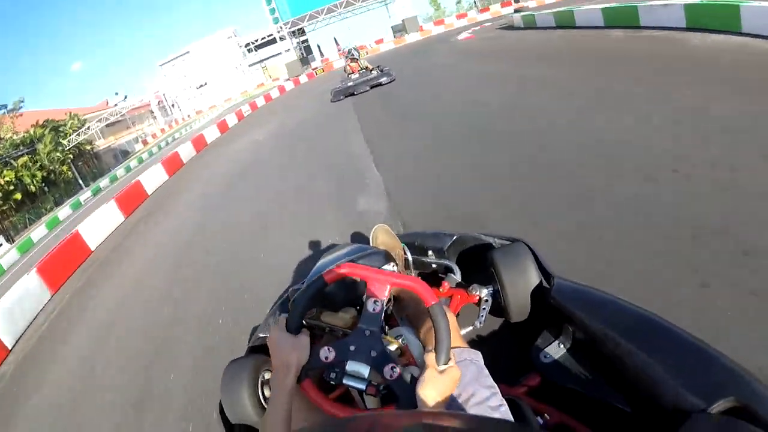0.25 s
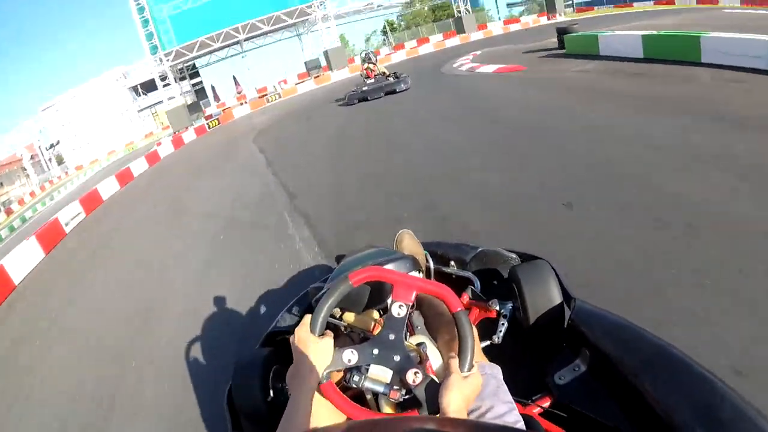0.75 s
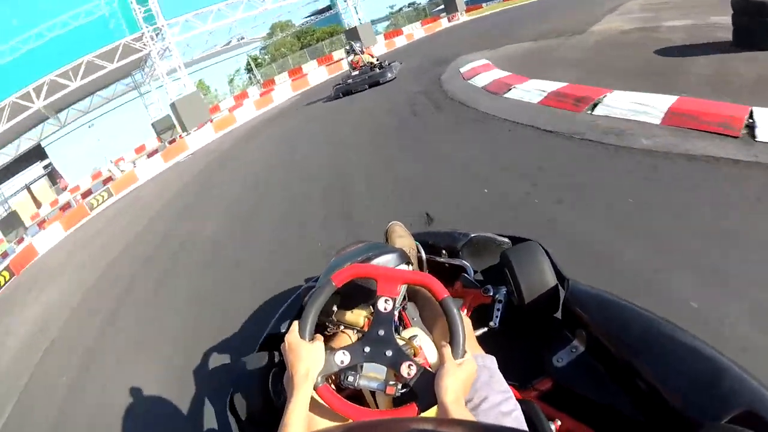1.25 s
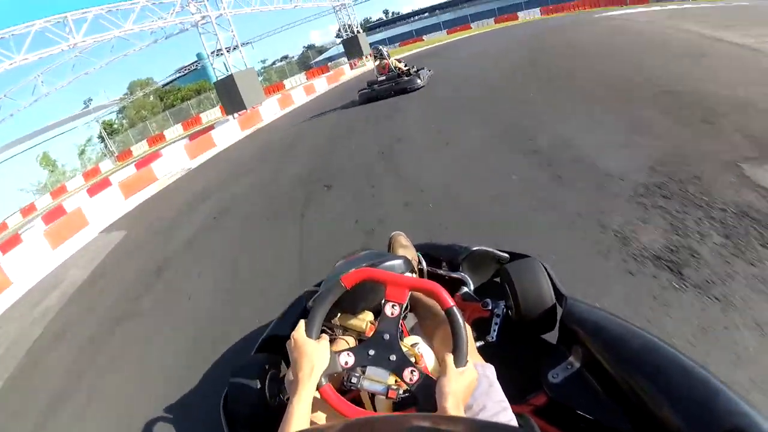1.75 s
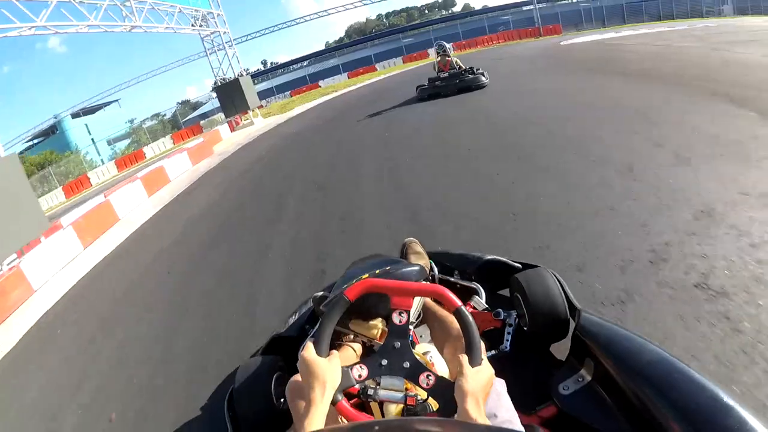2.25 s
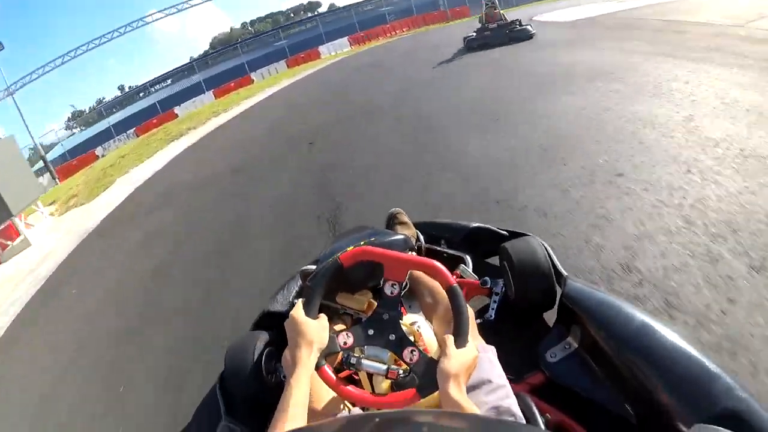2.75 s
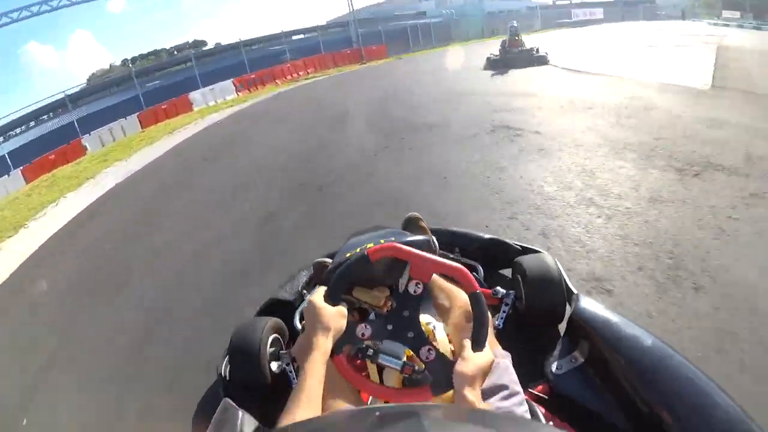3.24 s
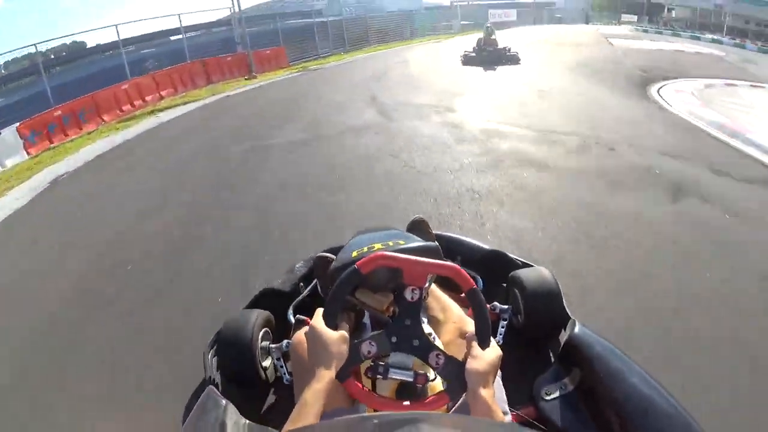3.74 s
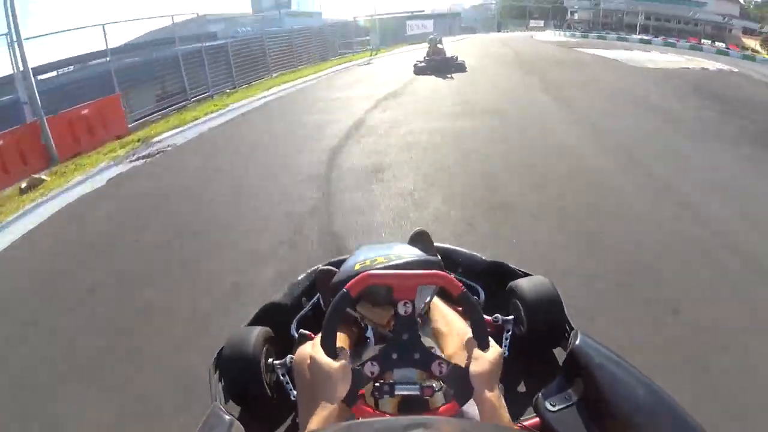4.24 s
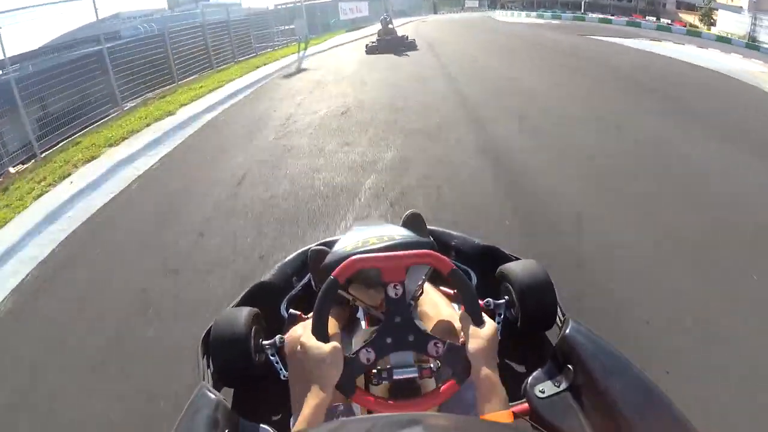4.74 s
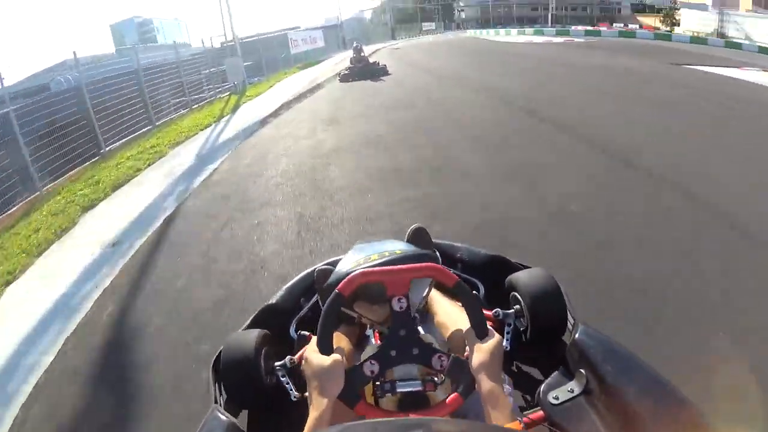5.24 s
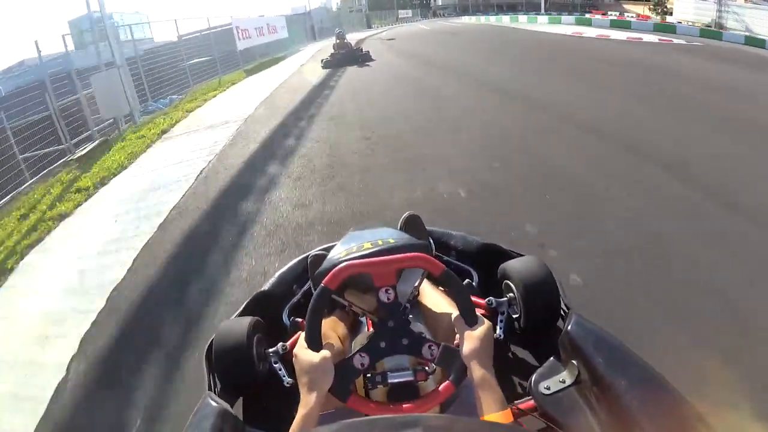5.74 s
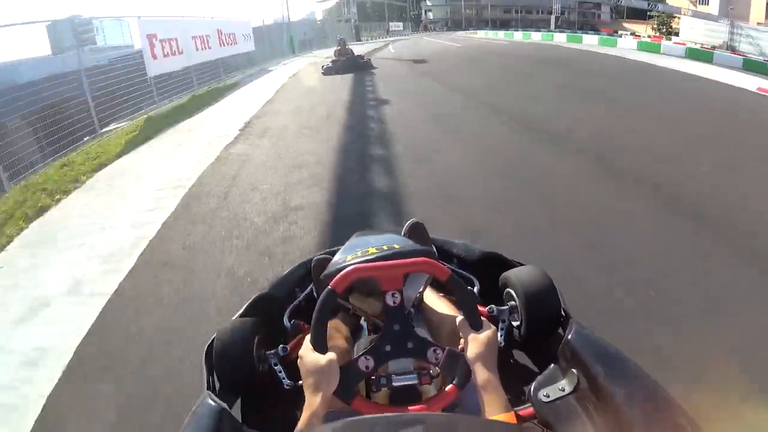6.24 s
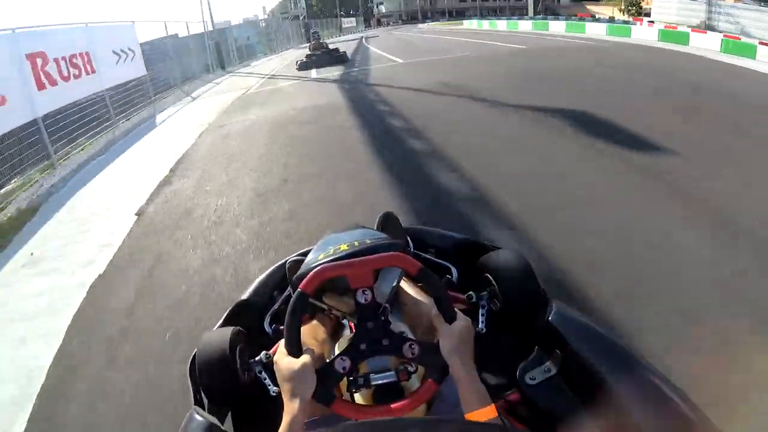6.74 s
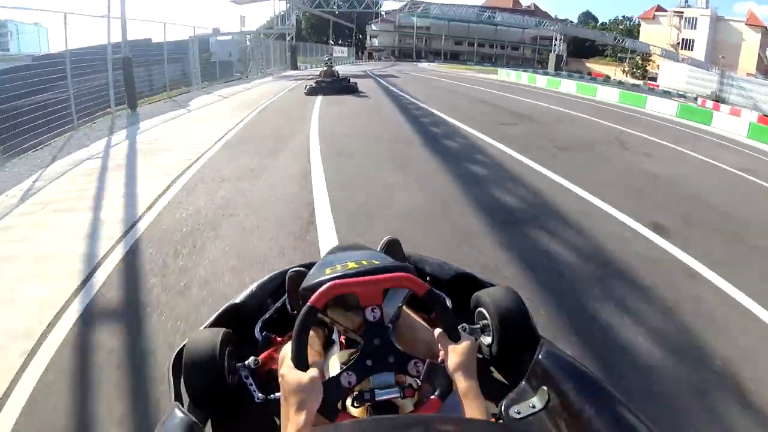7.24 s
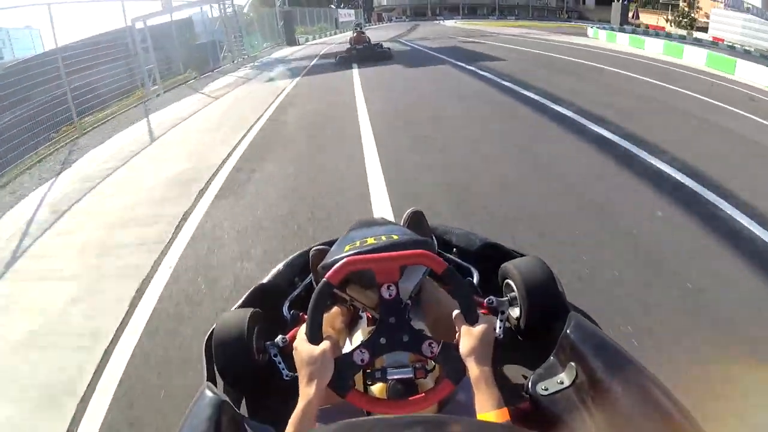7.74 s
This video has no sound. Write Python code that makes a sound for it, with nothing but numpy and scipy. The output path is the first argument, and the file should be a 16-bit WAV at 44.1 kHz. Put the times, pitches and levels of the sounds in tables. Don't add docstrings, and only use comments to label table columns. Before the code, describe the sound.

Heard from the driver's helmet outdoors, a single-cylinder kart engine buzzes with metallic clatter. Its pitch sinks through a long bend while the tyres squeal, scrub and chirp in quick hops. Around four seconds the rubber grips, a few dull chassis knocks and split-second dropouts come, then the engine pulls steadily upward onto the straight. Wind rumbles in uneven gusts throughout.

```python
import sys
import numpy as np
from scipy import signal
from scipy.fft import rfft, irfft
from scipy.io import wavfile
from scipy.ndimage import uniform_filter1d

SR = 44100
rng = np.random.default_rng(int(sys.argv[2]) if len(sys.argv) > 2 else 0)


def magnitude_from_level(level_db):
    exponent = np.asarray(level_db, float) / 20
    return 10 ** exponent


def generate_wav(sig):
    pcm = np.round(np.clip(np.atleast_2d(sig).T, -1, 1) * 32767).astype(np.int16)
    wavfile.write(sys.argv[1], SR, pcm)


N = 352359

# [t/s, level/dB]
SLIDE = [
    (0.0, -24),
    (0.4, -11.5),
    (0.8, -17),
    (1.2, -19.5),
    (1.75, -15.5),
    (1.98, -31),
    (2.7, -21.5),
    (3.2, -21),
    (3.8, -29),
]
# [t/s, whistle lift/dB, scrub lift/dB]
HOPS = [(.09, 0, -4), (.37, 9, -6), (.49, 0, -2), (.62, -2, 1), (.86, -1, -4), (1.05, 6, -1), (1.25, 6, -1),
        (1.36, 3, 1), (1.46, 3, -5), (1.6, -3, 1), (1.74, 12, -3), (1.88, 12, 10), (2.03, 17, 14),
        (2.165, 13, 12), (2.32, 8.5, 12), (2.49, 5, 2), (2.59, 6, 4), (2.77, 3, -1), (2.9, 5, -3),
        (3.08, -1.5, 3.5), (3.25, 20, 11.5), (3.38, 24.5, -2), (3.5, 17, 9), (3.64, 12, 16),
        (3.76, 20.5, 5), (3.89, 17.5, 1), (4.03, 16, 1), (4.14, 13, 1), (4.28, 13, 1), (5.0, 14, -3)]
HOP_S = 0.033


def evened(x):
    return x / np.sqrt(np.mean(x ** 2) + 1e-20)


def read(points, hz):
    f, value = np.transpose(points)
    return np.interp(np.log(hz + 1), np.log(f + 1), value)


def curves(rows):
    s, *columns = np.transpose(rows)
    return [np.interp(np.arange(N) / SR, s, c) for c in columns]


def wander(per_s):
    width_ms = max(int(1000 / per_s), 1)
    steps = N * 1000 // SR + 2
    slow = uniform_filter1d(rng.standard_normal(steps), width_ms)
    slow = evened(uniform_filter1d(slow, width_ms))
    return np.interp(np.arange(N) * 1000 / SR, np.arange(steps), slow)


def swells(times_s, lifts_db, half_s):
    coarse_s = np.arange(0, N + 64, 64) / SR
    lift_db = np.exp(-((coarse_s[:, None] - times_s) / half_s) ** 2) @ lifts_db
    return np.interp(np.arange(N) / SR, coarse_s, lift_db)


def resonate(x, hz, width_hz):
    turn = np.exp(2j * np.pi * np.cumsum(hz * np.ones(N)) / SR)
    r = np.exp(-np.pi * width_hz / SR)
    return 2 * (turn * signal.lfilter([1 - r], [1, -r], x / turn, axis=-1)).real


def causal(db):
    fold = irfft(db * np.log(10) / 20)
    fold[1:len(db) - 1] *= 2
    fold[len(db):] = 0
    return irfft(np.exp(rfft(fold)))[:4096]


def housing_db(hz, column=2):
    # [f/Hz, width/Hz, sum/dB, difference/dB]
    modes = np.array([(97, 15, 6.5, .1), (530, 68, 3.5, -14), (739, 123, 6, -5), (4476, 110, 7, 0),
                      (912, 48, 6, 10), (1128, 120, 7, -8), (1600, 190, 5, 6), (2206, 550, 5, 3),
                      (2440, 50, 5.5, 3.5), (2930, 260, -3.5, 4.5), (3400, 186, 4, 12.5),
                      (4410, 200, -4.5, 1), (4570, 160, 3, 3), (1937, 81, 6, -2), (8070, 290, 8, 1),
                      (9000, 200, -23, -12), (10480, 330, -21, -4), (11430, 840, 3.5, -8),
                      (13150, 810, -10, -2), (13250, 300, -9, -6), (14750, 540, 7, 6)])
    offset = 2 * (hz[:, None] - modes[:, 0]) / modes[:, 1]
    return 1 / (1 + offset ** 2) @ modes[:, column]


def ports(pair, low_hz, high_hz):
    # [f/Hz, density/dB per Hz]
    mid_points = [(24, -31), (40, -23.5), (194, -15.5), (305, -9.5), (354, -8.5), (542, -8), (600, -6),
                  (733, -6), (1240, -8), (1550, -3), (2000, -19.5), (3300, -11), (8990, -32.5),
                  (14500, -25.5), (16000, -47)]
    # [f/Hz, density/dB per Hz]
    side_points = [(24, -45), (40, -81), (269, -41), (412, -7.5), (600, -16), (1850, -1), (2380, -5),
                   (3470, -5), (6020, -7), (6820, -0.5), (7540, -9), (14800, -16.5), (16000, -32)]
    # [f/Hz, lead/rad]
    lead_points = [(0, 0), (2500, -0.1), (2840, 1.7), (3100, -1.1), (3700, 1.3), (4650, -1.4), (5000, 1.2),
                   (7060, -3.9), (8610, 3.2), (10200, 3.1), (11800, -0.5), (12800, 2.9), (13300, -0.2),
                   (16200, 0.0)]
    # [f/Hz, left-right/dB]
    balance_points = [(60, -0.5), (450, -1), (740, 2.4), (1220, -2.5), (2000, 2), (3330, -3.5),
                      (4200, -2.5), (5000, 3.5), (6800, 0.5), (9000, -2), (15000, -2.3)]
    side_level_db, locked = -15, 0.64

    hz = np.fft.rfftfreq(8192, 1 / SR) + 1
    band_db = -10 * np.log10((1 + (low_hz / hz) ** 6) * (1 + (hz / high_hz) ** 6))
    mid_db, sum_modes_db = read(mid_points, hz), housing_db(hz)
    mid = rfft(causal(mid_db + sum_modes_db + band_db), 8192)
    side_db = read(side_points, hz) - mid_db + housing_db(hz, column=3) - sum_modes_db + side_level_db
    side = mid * magnitude_from_level(side_db)
    share = np.clip(locked * np.sin(read(lead_points, hz)), -1, 1)
    direct = 1j * share * side
    scatter = side * np.sqrt(1 - share ** 2)
    lean = magnitude_from_level(read(balance_points, hz) / 2)
    paths = [[(mid + direct) * lean, scatter * lean],
             [(mid - direct) / lean, -scatter / lean]]
    taps = np.roll(irfft(np.array(paths)), 512, axis=2)[:, :, :3072]
    out = signal.oaconvolve(pair[None], taps, axes=2)[:, :, 512:N + 512].sum(axis=1)
    return out / np.sqrt(np.mean(out.mean(axis=0) ** 2))


def firing_turns():
    # [t/s, firing rate/Hz]
    firing = [(0, 35.98), (0.8, 34.69), (1.2, 33.74), (1.6, 33.44), (2.4, 32.41), (3.2, 32.38),
              (3.6, 32.03), (4, 32.38), (4.8, 33.88), (5.6, 35.63), (6, 36.72), (7.2, 39.12), (7.99, 40.36)]
    turns = np.cumsum(curves(firing)[0]) / SR + .36
    return turns + .002 * wander(8)


def shell(turns):
    # [f/Hz, level/dB, decay/turns]
    rings = [(745, -12, .25), (1560, -6.5, .22)]
    since, count = turns % 1, turns.astype(int)
    luck = rng.standard_normal((count[-1] + 1, len(rings), 3))[count]
    out = np.zeros(N)
    for k, (hz, db, decay_turns) in enumerate(rings):
        level_luck, pitch_luck, phase_luck = luck[:, k].T
        swell = evened(np.minimum(since / .09, 1) * np.exp(-since / decay_turns))
        cycles = np.cumsum(hz * (1 + .03 * pitch_luck)) / SR + phase_luck
        out += magnitude_from_level(db + 1.2 * level_luck) * swell * np.sqrt(2) * np.sin(2 * np.pi * cycles)
    return out


def exhaust(turns, punch):
    fired = np.flatnonzero(np.diff(np.floor(turns)))
    blows = np.zeros(N)
    blows[fired] = magnitude_from_level(1.2 * rng.standard_normal(len(fired)))
    pipe = np.zeros(700)
    for delay_s, height in ((0, 0.42), (.0013, 0.75), (.0027, 0.96), (.0042, 0.44), (.0085, 0.48)):
        pipe[int(delay_s * SR)] = height
    blows = evened(signal.oaconvolve(blows, pipe)[:N])
    blows = signal.sosfilt(signal.butter(4, 1050, "high", fs=SR, output="sos"), blows)
    since = turns % 1
    puff = 1 + 1.5 * punch * np.minimum(since / 0.043, 1) * np.exp(-since / 0.18)
    punch = np.clip(punch, 0, 1)
    roar = evened(puff * magnitude_from_level(0.91 * wander(38)) * rng.standard_normal((2, N)))
    return ports(0.35 * punch * blows + roar, 175, 1670) + punch * shell(turns)


def clatter(turns, punch):
    since = turns % 1
    rattle = 1 + 0.55 * np.clip(punch, 0, 1) * np.exp(-((since + 0.4) % 1 - .5) ** 2 / 0.022)
    ticks = 1 + 2.4 * (rng.random(N) < 250 / SR) * rng.exponential(1, N)
    noise = rng.standard_normal((2, N))
    return ports(rattle * ticks * magnitude_from_level(0.82 * wander(38)) * noise, 2340, 17000)


def drone(turns):
    # [t/s, load/1, note level/dB]
    throttle = [(0, 1, 1.5), (.5, .9, 1.5), (.8, 0, 3.5), (1.7, 0, 3.5), (2.4, 0, 1.5), (3.2, 0, 0),
                (3.6, 0, -2.5), (4.4, .2, -2), (5.1, .9, 1.5), (5.7, 1.2, 1.5), (6.2, 2, 1), (6.7, 2.1, 1),
                (7.2, 3, 1), (7.99, 3, 1)]
    orders = [(4, -49, -48, -51, -51), (5, -48, -50, -51, -49), (6, -50, -47, -41, -43),
              (7, -39, -39, -46, -43), (8, -42, -43, -39, -39), (10, -45, -41, -39, -38),
              (11, -36, -38, -36, -33), (12, -45, -46, -33, -30), (13, -50, -43, -34, -35),
              (14, -40, -39, -30, -28), (15, -30, -30, -27, -34), (16, -38, -46, -39, -34),
              (17, -37, -41, -34, -35), (18, -37, -31, -25, -24), (19, -36, -29, -26, -25),
              (20, -41, -33, -30, -34), (21, -30, -34, -35, -48), (22, -27, -30, -44, -36),
              (23, -48, -38, -37, -30), (24, -40, -45, -28, -38), (25, -50, -36, -43, -42),
              (26, -42, -50, -36, -32), (28, -46, -36, -50, -31), (29, -50, -42, -35, -37),
              (39, -49, -45, -31, -30), (40, -45, -50, -48, -28), (41, -50, -36, -30, -43),
              (42, -50, -34, -39, -35), (43, -45, -33, -48, -50), (44, -40, -36, -33, -41),
              (45, -40, -34, -43, -50)]
    load, level_db = curves(throttle)
    out, every = np.zeros(N), np.arange(0, N, 64)
    for k, *state_db in orders:
        db = level_db[every] * min(k / 18, 1) + np.interp(load[every], range(4), state_db)
        db = db + 0.9 * wander(4)[every]
        loose = rng.random() * np.clip((17 - k) / 5, 0, 1)
        cycles = k * (turns + 0.016 - 0.00347 * min(k, 30)) + loose
        gain = np.interp(np.arange(N), every, np.sqrt(2) * magnitude_from_level(db))
        out += gain * np.cos(2 * np.pi * cycles)
    return out


def engine():
    # [t/s, exhaust level/dB, firing punch/1]
    running = [(0.0, -16.5, 0.1), (0.25, -17.5, 0.6), (0.7, -15.5, 0.2), (1.1, -18.5, 0.72),
               (2.2, -18, 0.12), (2.6, -19, 0.68), (3.9, -20.5, 0.62), (4.3, -20, 0.8), (4.65, -22, 1),
               (4.95, -19.5, 0.92), (6.1, -19.5, 0.8), (6.7, -17.5, 0.74), (7.1, -17.5, 0.4), (7.8, -17, 1),
               (7.99, -16, 0.5)]
    level_db, punch = curves(running)
    turns = firing_turns()
    clatter_db = -30.5 + 0.97 * (level_db + 19)
    scrub_treble_db = curves(SLIDE)[0] - 17.5
    clatter_gain = magnitude_from_level(11) * np.hypot(magnitude_from_level(clatter_db), magnitude_from_level(scrub_treble_db))
    return magnitude_from_level(level_db + 3.5) * exhaust(turns, punch) + clatter_gain * clatter(turns, punch) + drone(turns)


def whistle():
    # [t/s, f/Hz, level between hops/dB]
    pitch = [(0.0, 895, -23), (.85, 948, -32), (1.0, 944, -21), (1.5, 936, -19), (1.75, 924.5, -21),
             (2.1, 912, -24), (2.4, 909.7, -16), (3.1, 900, -14.5), (3.35, 894.6, -35.5),
             (4.3, 895.4, -23.5), (5.2, 898, -27.5)]
    hop_s, rear_db, _ = np.transpose(HOPS)
    hz, level_db = curves(pitch)
    level_db = level_db + swells(hop_s, rear_db, HOP_S)
    fuzzy = resonate(resonate(rng.standard_normal((2, N)), hz, 52), hz, 67)
    steady = np.sin(2 * np.pi * np.cumsum(hz * (1 + .005 * wander(30))) / SR)
    fade = np.clip((pitch[-1][0] - np.arange(N) / SR) / 0.25, 0, 1)
    return magnitude_from_level(level_db - 5.5) * fade * ports(evened(fuzzy) + 2.4 * steady, 700, 1200)


def scrub():
    # [f/Hz, width/Hz, level/dB]
    tread = [(2400, 110, 0.5), (2697, 64, 4), (3100, 200, -2.5), (3400, 350, -9), (3780, 290, -14.5),
             (4100, 130, -17.5)]
    lag_s = 0.056
    hop_s, _, front_db = np.transpose(HOPS)
    slide_db = curves(SLIDE)[0]
    hop_db = swells(hop_s + lag_s, front_db, HOP_S)
    low_db, high_db = slide_db - 9, slide_db
    low_db, high_db = low_db + hop_db, high_db + 0.63 * hop_db
    out, slips = np.zeros((2, N)), rng.standard_normal((2, N))
    for f, width_hz, db in tread:
        ring = evened(resonate(slips, f * (1 + 0.021 * wander(23)), width_hz))
        block_db = low_db if f < 2900 else high_db
        out += magnitude_from_level(db + block_db + 3.5 * wander(55)) * ring
    out *= np.clip((SLIDE[-1][0] - np.arange(N) / SR) / 0.5, 0, 1)
    return magnitude_from_level(-2.0) * np.std(out) * ports(out, 2240, 8200)


def squeaks():
    # [t/s, peak/dB, f/Hz]
    chatter = [(0.1361, -11, 2350), (0.2534, -14, 2450), (0.316, -15, 2450), (0.3492, -10, 2400),
               (0.4245, -5, 2440), (0.472, -16, 2440), (0.548, -5, 2480), (0.6045, -5, 2410),
               (0.6618, -4, 2450), (0.7078, -16, 2470), (0.7877, -15, 2430), (0.9074, -8, 2440),
               (0.95, -11, 2440), (1.0401, -14, 2440), (1.0977, -11, 2450), (1.1358, -14, 2440),
               (1.3896, -14, 2240), (1.529, -8, 2440), (1.5858, -10, 2440), (1.6332, -7, 2360),
               (1.754, -10, 2470), (1.8158, -12, 2400), (2.0544, -9, 2480), (2.192, -9.5, 2430),
               (3.0435, -10, 2490), (3.098, -9, 2490), (3.2266, -21, 2490), (3.2683, -10, 2340),
               (3.4222, -12, 2490), (3.5323, -19, 2420),
               (0.0957, -9, 2680), (0.2514, -12, 2760), (0.3741, -2, 2760), (0.4082, -4, 2650),
                     (0.4729, -15, 2700), (0.5317, -4, 2640), (0.6215, -5, 2750), (0.7408, -16, 2720),
                     (1.0052, -13, 2690), (1.3389, -11, 2700), (1.3783, -11, 2680), (1.537, -9, 2720),
                     (1.6292, -13, 2700), (1.6612, -7, 2720)]
    # [t/s, peak/dB, f/Hz]
    clear = [(0.1273, -20, 3330), (0.225, -7, 3480), (0.4815, -14, 3270), (0.723, -6, 3160),
             (0.8796, -0.5, 3510), (1.0505, -4, 3100), (1.3231, -20, 3450), (1.7406, -16, 3450),
             (2.0414, -1.5, 3190), (2.3158, -8, 3430), (2.4968, -13, 3490), (2.5468, -12, 3420),
             (2.814, -6, 3320), (3.0322, -14, 3280), (3.2981, -7, 2500), (3.4782, -14, 3430),
             (0.34, -2, 3420), (0.439, -5, 3430), (0.555, 5, 3050), (0.68, -17, 3290), (1.4822, -7, 3140),
             (1.5935, -8, 3230), (1.6506, -16, 3380), (2.2074, -8, 3280), (3.1533, -11, 3220),
             (3.921, -11.5, 3340), (2.065, -5, 3330), (2.086, -5, 3470), (2.035, -6, 3050),
             (2.3933, -5, 3260), (2.525, -10, 3330), (2.755, -9, 3360), (2.9363, -9, 3150),
             (3.3019, -11, 3240), (.29, -7, 3600), (.39, -8, 3200), (.62, -3, 3130), (.78, -7, 3400),
             (.51, -8, 3870), (.645, -8, 4170), (3.518, 4, 7950), (3.525, -9, 7300)]
    chatter_db, chatter_s, clear_s = 7, 0.013, 0.022
    chirps = [(s, db + chatter_db, hz, chatter_s) for s, db, hz in chatter]
    chirps += [(*row, clear_s) for row in clear]
    tones = np.zeros((2, N))
    for s, peak_db, hz, length_s in chirps:
        t = np.arange(0, length_s, 1 / SR)
        glide_hz = hz * (1 + 0.042 * rng.standard_normal() * (t / t[-1] - .5))
        phase = 2 * np.pi * (np.cumsum(glide_hz) / SR + rng.random((2, 1)))
        tones[:, round(s * SR):][:, :len(t)] += magnitude_from_level(peak_db) * np.sin(np.pi * t / t[-1]) * np.sin(phase)
    return magnitude_from_level(-8) * np.std(tones) * ports(tones, 1400, 6100)


def wind():
    # [t/s, lift/dB, half length/s]
    gusts = [(.06, 14.5, 0.21), (.39, 11, 0.1), (0.687, 9.5, 0.22), (.96, 13, .04), (1.2, 7, 0.11),
             (1.97, 5, 0.32), (2.32, 10, .03), (2.6, 8, .04), (3.298, 17, 0.035), (3.54, 12, .04),
             (3.722, 8, 0.027), (4.33, 12, 0.044), (4.57, 10, 0.17), (4.774, 13, 0.061), (5.147, 8, 0.082),
             (5.282, 15, 0.02), (5.57, 12, 0.083), (6.0, 12, 0.21), (6.425, 9, 0.041), (6.775, 7.5, 0.26),
             (7.136, 11, .05), (7.303, 11, 0.069), (7.607, 7, 0.092), (7.99, 9, 0.023)]
    lull_db = -44
    level_db = lull_db + swells(*np.transpose(gusts)) + 0.5 * wander(24)
    return magnitude_from_level(level_db) * ports(rng.standard_normal((2, N)), 20, 143)


def stones():
    # [t/s, peak/dB, left-right/dB]
    hits = [(1.258, 5, 5), (1.5393, -8, -0.5), (1.9748, -11, -4), (2.32, -9, 0), (3.15, -18, 0),
            (.7228, -12, -1), (1.3369, -16, 0), (1.6731, -19, 0), (2.7033, -18, 0), (4.125, -20, 1),
            (5.7633, -14, 0)]
    out, t = np.zeros((2, N)), np.arange(300) / SR
    for s, peak_db, pan_db in hits:
        burst = np.diff(rng.standard_normal(303), 3) * np.minimum(t / 0.00099, 1) * np.exp(-t / 0.0016)
        at = round(s * SR)
        port_db = peak_db + np.array([[pan_db], [-pan_db]]) / 2
        out[:, at:at + 300] += magnitude_from_level(port_db) * burst / abs(burst).max()
    return out


def knocks():
    # [t/s, peak/dB]
    ridges = [
        (3.975, 0),
        (4.431, 4),
        (4.478, 0),
        (4.536, 0),
        (4.764, 1),
        (6.916, 2),
    ]
    blows = np.zeros((2, N))
    for s, peak_db in ridges:
        blows[:, round(s * SR):][:, :60] += magnitude_from_level(peak_db) * evened(rng.standard_normal((2, 60)))
    out = ports(blows, 600, 3000)
    return out * 1.7 / abs(out).max()


def scene():
    return engine() + whistle() + scrub() + squeaks() + wind() + stones() + knocks()


def top_cut(x):
    return signal.sosfilt(signal.butter(12, 16610, fs=SR, output="sos"), x)


def record(dry):
    # [t/s, length/s, depth/dB, stuck membrane height/1]
    jolts = [
        (.4605, .0115, -19, .08),
        (3.2775, .013, -38, .1),
        (3.7185, .0025, -12, .0),
        (4.327, .0165, -44, .22),
        (4.4512, .009, -38, .1),
        (4.5695, .0095, -21, .1),
        (4.6988, .0042, -19, .0),
        (4.755, .003, -15, .0),
        (5.2758, .0062, -24, .0),
        (6.0795, .0042, -16, .0),
    ]
    t = np.arange(N) / SR
    limited = dry / (1 + (dry / .66) ** 4) ** .25
    gain_db, stuck = np.zeros(N), np.zeros(N)
    for s, length_s, depth_db, height in jolts:
        gain_db += depth_db * np.clip(np.minimum((t - s) / .001, (s + length_s - t) / .001), 0, 1)
        after = np.maximum(t - s, 0) / 0.000087
        stuck += height * (1 - np.exp(-after)) * np.exp(-after / 1.6)
    edge = signal.firwin(255, 15400, window=("kaiser", 8), fs=SR)
    finished = signal.oaconvolve(limited * magnitude_from_level(gain_db) + stuck, edge[None], "same")
    return top_cut(finished)


dry = scene()
out = record(dry)
generate_wav(out)
```